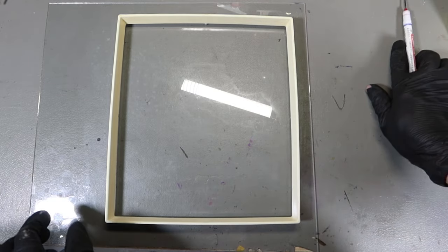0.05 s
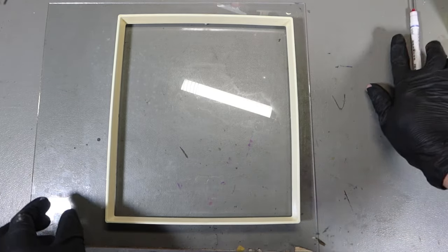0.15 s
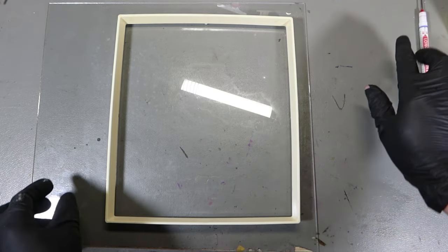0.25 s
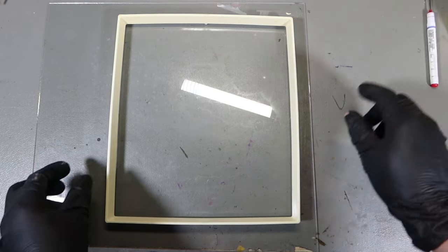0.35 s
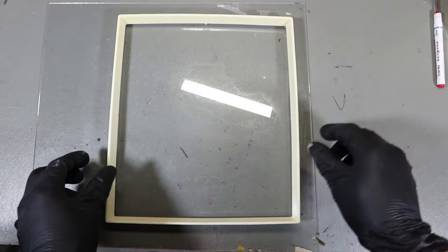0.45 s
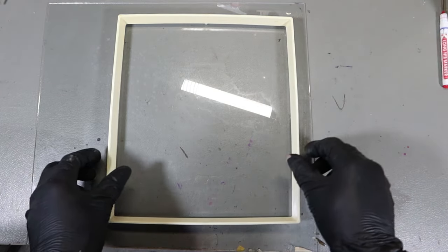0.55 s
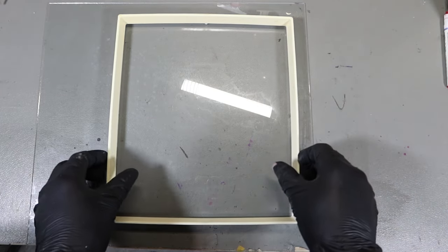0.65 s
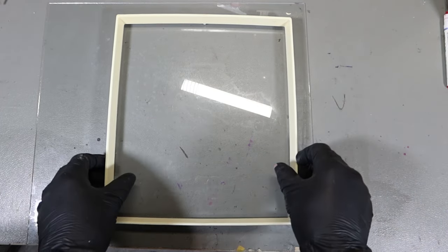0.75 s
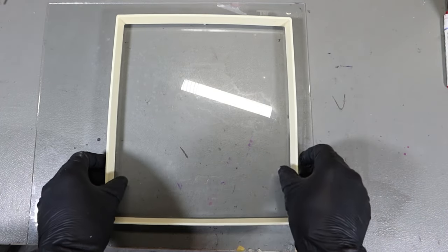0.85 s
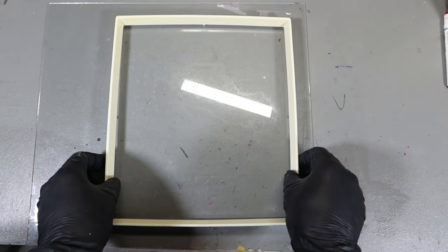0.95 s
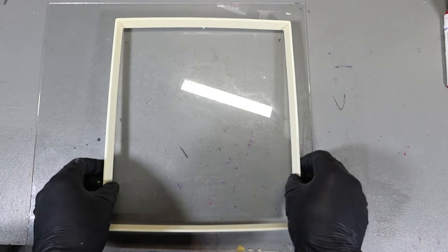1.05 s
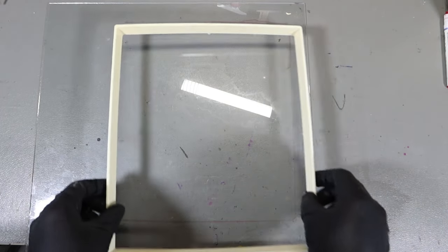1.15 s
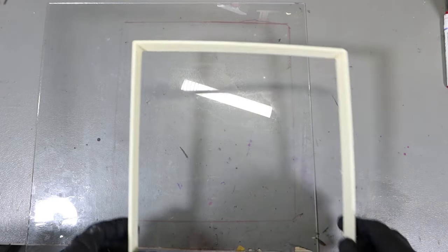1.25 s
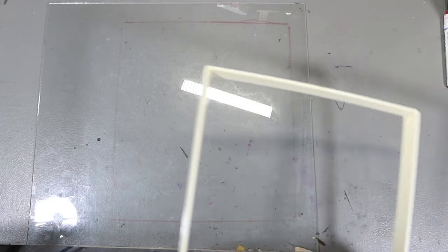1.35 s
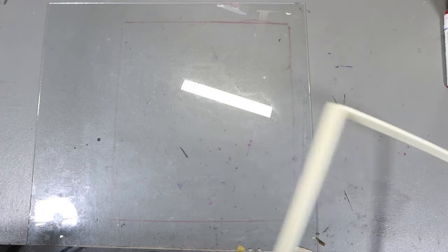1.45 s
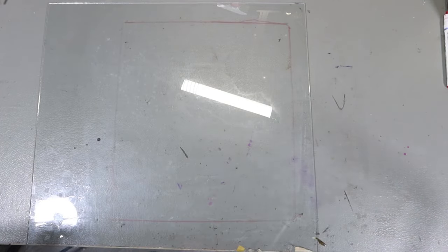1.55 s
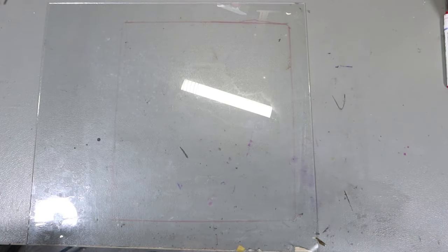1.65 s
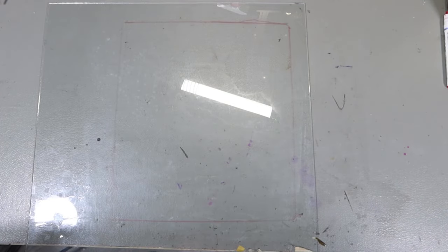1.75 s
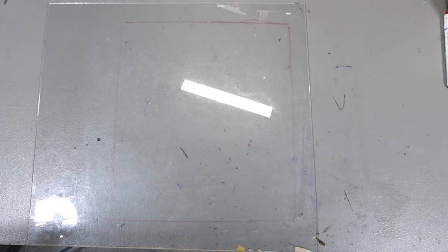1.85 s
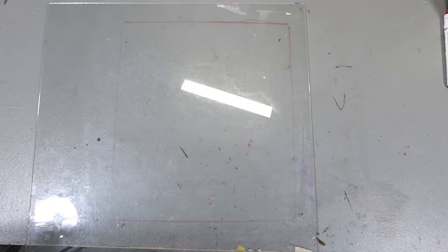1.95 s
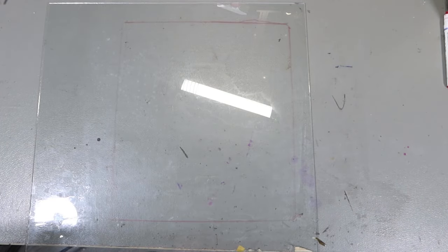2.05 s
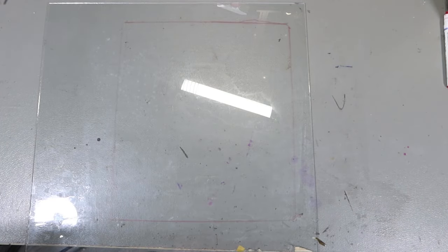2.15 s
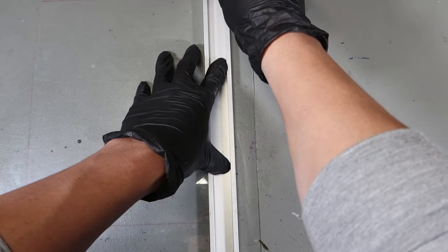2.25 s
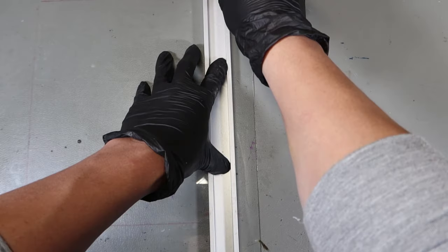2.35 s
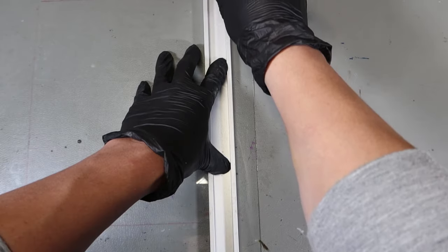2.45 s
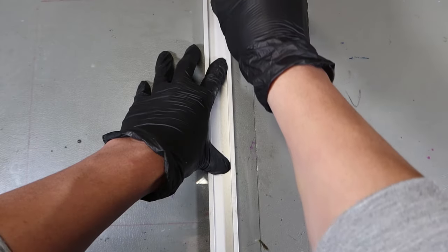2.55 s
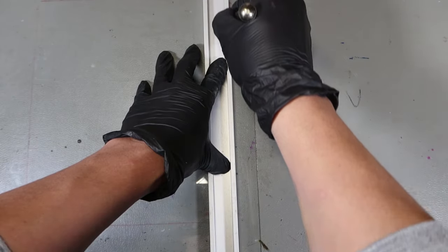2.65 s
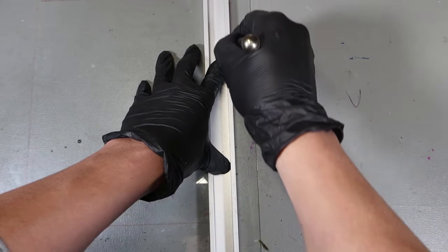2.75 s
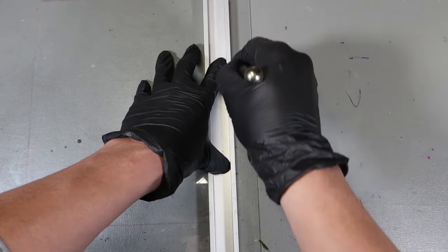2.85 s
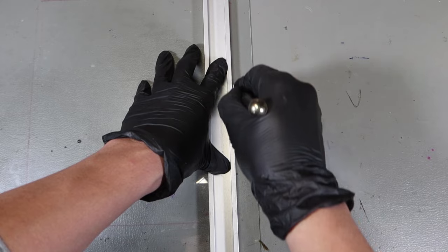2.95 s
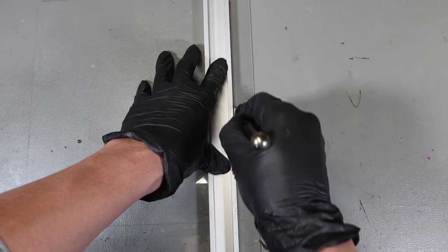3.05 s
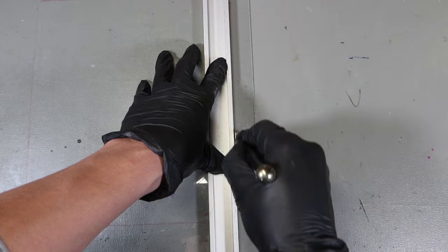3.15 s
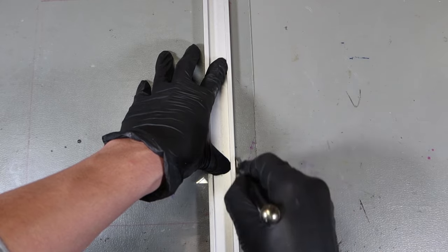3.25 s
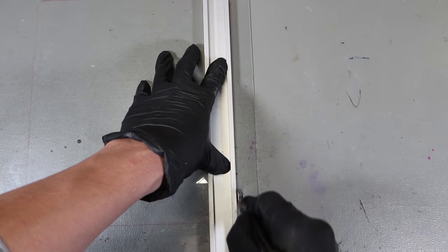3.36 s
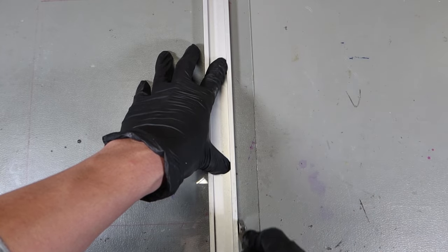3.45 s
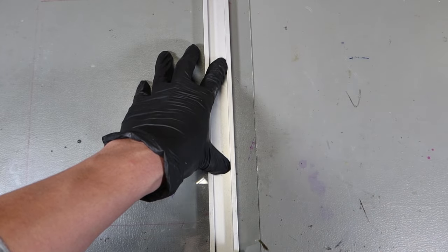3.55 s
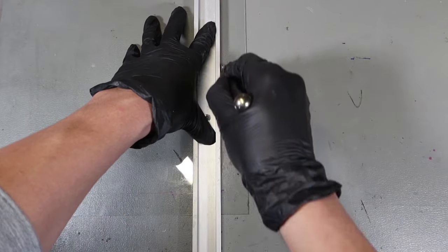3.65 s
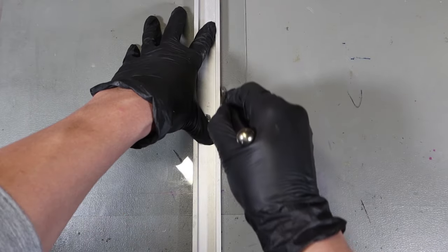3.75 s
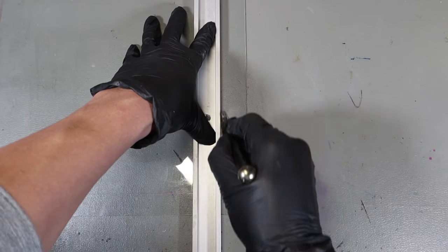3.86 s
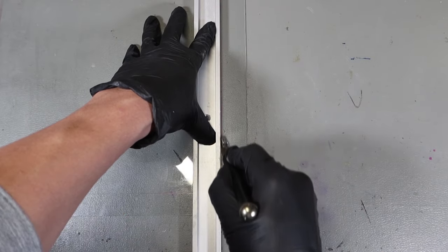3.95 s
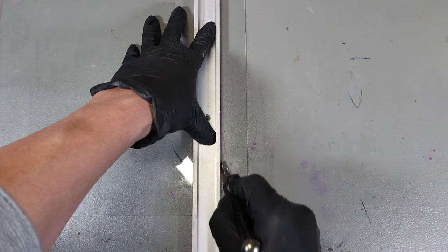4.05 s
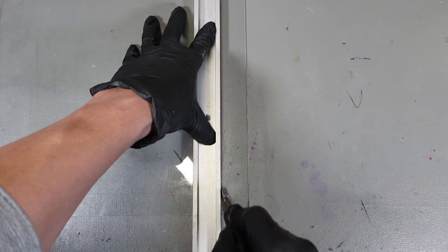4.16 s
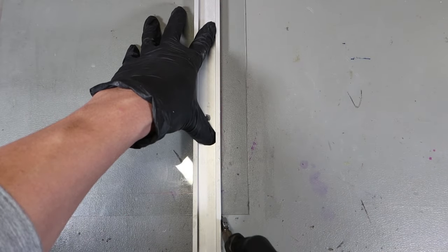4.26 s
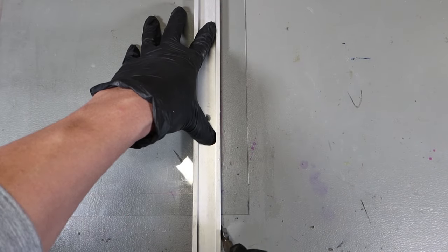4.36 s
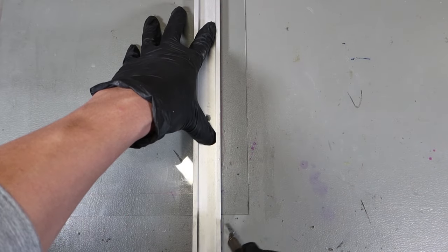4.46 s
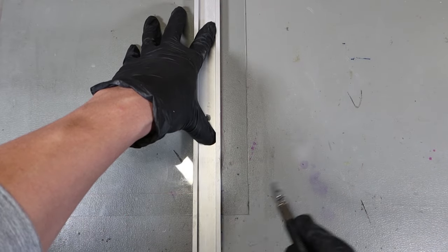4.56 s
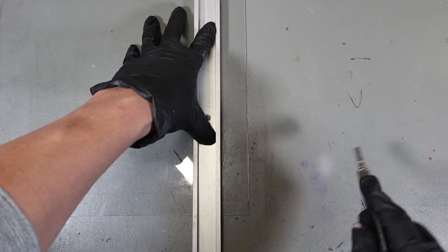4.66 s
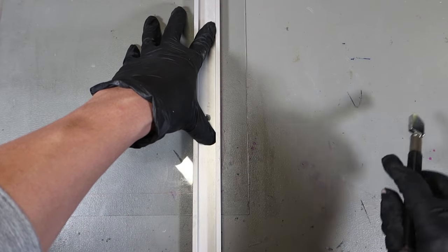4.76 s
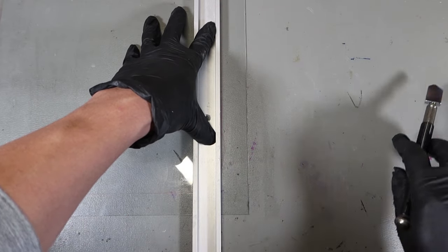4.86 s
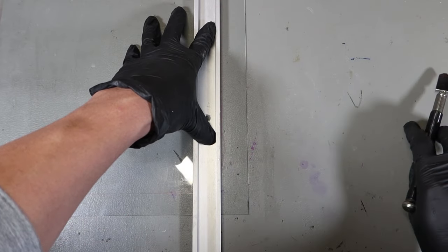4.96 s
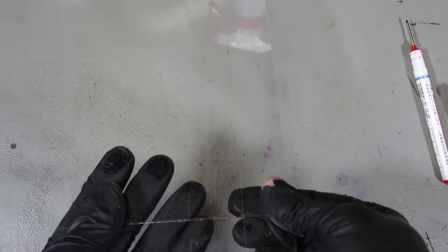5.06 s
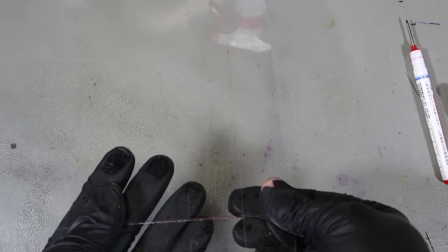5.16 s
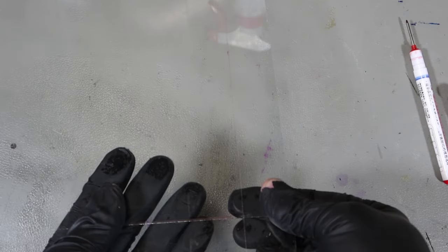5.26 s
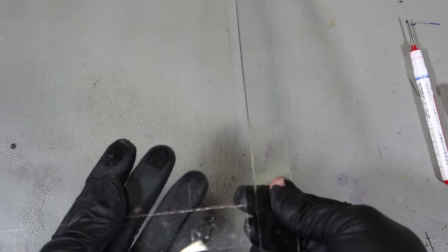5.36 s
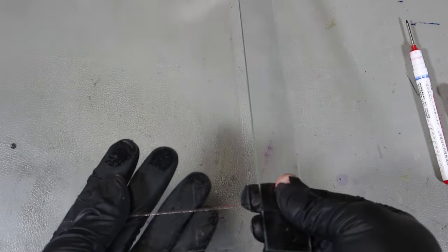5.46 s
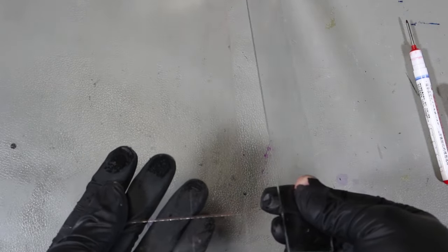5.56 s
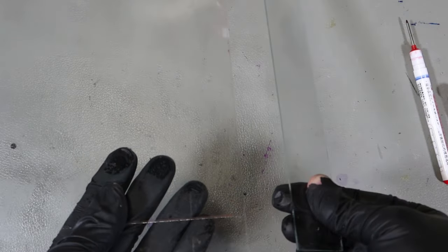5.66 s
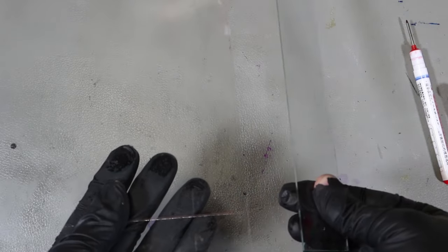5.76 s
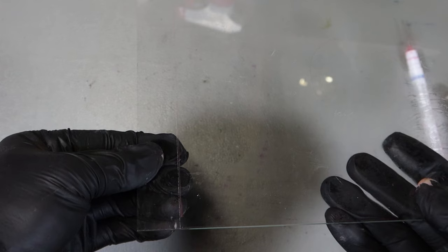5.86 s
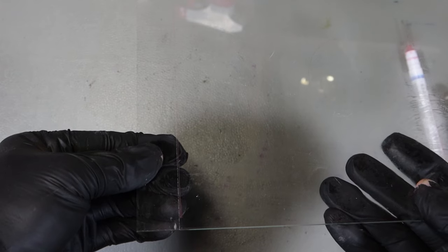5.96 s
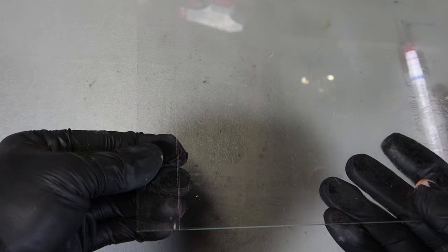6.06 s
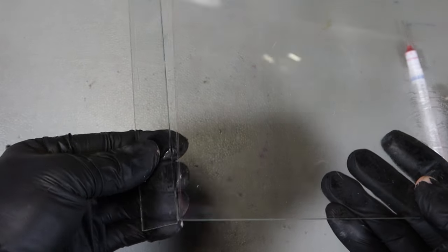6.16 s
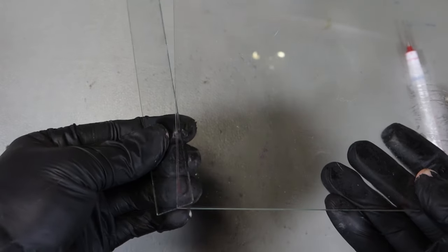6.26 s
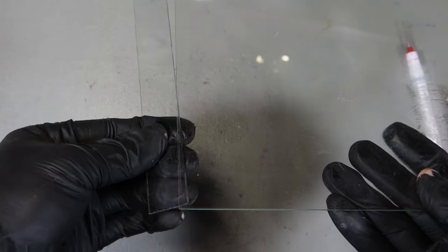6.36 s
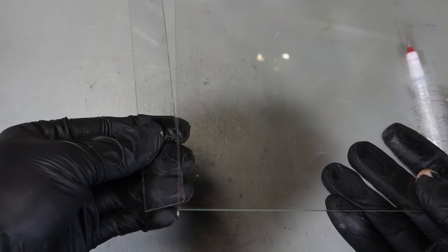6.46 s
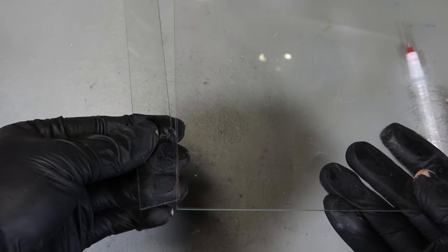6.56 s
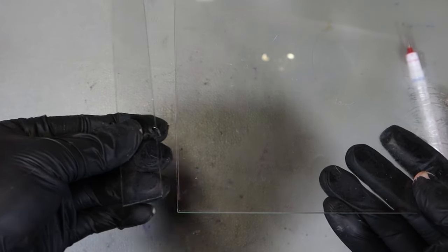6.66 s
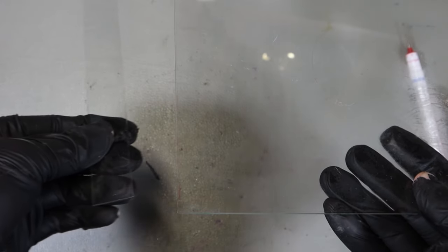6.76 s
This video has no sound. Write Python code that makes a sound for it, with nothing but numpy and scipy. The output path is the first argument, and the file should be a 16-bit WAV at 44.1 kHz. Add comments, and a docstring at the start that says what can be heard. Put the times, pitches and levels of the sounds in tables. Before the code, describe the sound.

The sounds are close, in a small workshop with faint background air. At about 0.2 seconds a marker pen taps down on the bench. Between 0.7 and 1.2 seconds a plastic frame knocks lightly on a glass sheet three times, with a low rumble from the bench. Around 2.1 seconds a rule slides faintly and ticks into place. A cutter wheel catches a few times, then from 2.7 seconds scores the glass with a continuous, gritty, hissing rasp. At 4.4 seconds it runs off the edge and hits the bench with a metallic click and a deep thump. At 5.4 seconds a strip snaps off with a loud, briefly ringing crack, followed by chattering glass edges. A second sharp crack comes at 6.2 seconds, with a light clap and more bright ticks, which fade by 6.8 seconds. The bench booms softly beneath both breaks.

```python
"""Cutting glass on a workbench.

Close up in a small workshop: a pen is put down, a plastic frame knocks on a glass sheet, a rule slides.
A cutter wheel rasps along the rule, crushing tiny chips, and drops off the edge onto the bench.
Two strips snap off and ring, their fresh edges chatter against the sheet; the bench booms under it all."""
import sys
import numpy as np
from scipy import signal
from scipy.fft import rfft, irfft
from scipy.io import wavfile
from scipy.ndimage import uniform_filter1d

SR = 44100
rng = np.random.default_rng(int(sys.argv[2]) if len(sys.argv) > 2 else 0)


def materialize(psi):
    """Save the field psi as 16-bit PCM at rate SR to the path in sys.argv[1].

    A 1-D psi becomes a single channel; in a 2-D psi each row is a channel.
    """
    bounded = np.clip(np.atleast_2d(psi).T, -1, 1)
    quanta = np.round(bounded * 32767).astype(np.int16)
    wavfile.write(sys.argv[1], SR, quanta)


N = 299880
T = np.arange(N) / SR
TAPS = 8192
HZ = np.maximum(np.arange(TAPS + 1) * SR / (2 * TAPS), 1)

# cutter stroke, relative levels: time_s, rasp_db, treble_db, growl_db
STROKE = [(2.66, -50, -7, -2.5), (2.696, -49, -8, -7), (2.772, -45, -5.5, -7), (3.058, -50, -4, -6),
          (3.086, -51.5, -3, -7), (3.288, -47.5, -3, -8.5), (3.368, -50, -2.5, 0), (3.592, -48.5, -1.5, -9),
          (3.662, -50, -4.5, -5.5), (3.846, -49.5, -0.5, -8.5), (4.0, -49, -4.5, -3.5), (4.08, -51, -2, -5),
          (4.264, -47.5, -2.5, -3.5), (4.345, -47, -8, -3)]


def undb(db):
    """Decibels to gain."""
    return 10 ** (np.asarray(db) / 20)


def unit(x):
    """Scale to rms 1."""
    return x / np.sqrt(np.mean(x ** 2))


def curve(table, column=1):
    """One table column, interpolated over time."""
    return np.interp(T, np.array(table)[:, 0], np.array(table)[:, column])


def contour(points, hz=HZ):
    """Values interpolated over log frequency."""
    f, value = np.transpose(points)
    return np.interp(np.log(hz), np.log(f), value)


def humps(modes):
    """Gain of resonances above a flat response."""
    return np.sqrt(1 + sum(undb(db) ** 2 / (1 + (2 * (HZ - f) / width) ** 2) for f, width, db in modes))


def colour(x, gain):
    """Minimum-phase filter; keeps the power of white noise."""
    cepstrum = irfft(np.log(unit(gain) + 1e-9))
    cepstrum[1:TAPS] *= 2
    cepstrum[TAPS + 1:] = 0
    return signal.oaconvolve(x, irfft(np.exp(rfft(cepstrum)))[:TAPS])[:N]


def band(x, low_hz, high_hz):
    """Zero-phase band-pass."""
    return signal.sosfiltfilt(signal.butter(2, [low_hz, high_hz], "band", fs=SR, output="sos"), x)


def walk(rate_hz):
    """Smooth random wander, rms 1."""
    hold = max(int(SR / rate_hz), 1)
    steps = np.repeat(rng.standard_normal(N // hold + 1), hold)
    return unit(uniform_filter1d(steps, hold)[:N])


def contacts(rows, rise_s, linger_db, linger_s, grit_db=2.5):
    """Each contact is a dense burst of uneven slips with a short shiver after it."""
    out, t = np.zeros(N + SR), T[:SR // 5]
    for start_s, db, length_s, bright_hz in rows:
        slips = rng.standard_normal(len(t)) * undb(grit_db * np.minimum(rng.exponential(size=len(t)), 5))
        shiver = undb(linger_db) * np.exp(-t / linger_s)
        shape = (1 - np.exp(-t / rise_s)) * (np.exp(-(t / length_s) ** 2 / 2) + shiver)
        soft = signal.sosfilt(signal.butter(2, min(bright_hz, SR / 2 - 1), fs=SR, output="sos"), slips)
        at = int(start_s * SR)
        out[at:at + len(t)] += undb(db) * unit(shape * soft) * np.sqrt(np.mean(shape ** 2))
    return out[:N]


def background(air_db=-64, sway_db=1.15, ramp_s=0.0085):
    """Quiet workshop air with a faint early hum and one brief far tone."""
    # air spectrum: freq_hz, gain_db
    spectrum = [(15, -47), (25, -9.5), (70, -9), (102, 3), (137, -16.5), (174, -13.5), (316, -17.5),
                (449, -13), (542, -19), (857, -17.5), (1250, -23), (2520, -26), (15800, -32.5)]
    # faint tones: start_s, end_s, pitch_hz, level_db
    tones = [(0, 2.2, 177.5, -72.5), (5.0, 5.11, 547, -64.5)]
    air = unit(colour(rng.standard_normal(N), undb(contour(spectrum))))
    air *= undb(air_db + sway_db * walk(4.6))
    for start_s, end_s, hz, db in tones:
        gate = np.clip(np.minimum(T - start_s, end_s - T) / ramp_s, 0, 1)
        air += undb(db) * gate * np.sin(2 * np.pi * hz * T)
    return air


def room(x, room_db=-11.5, build_s=0.0031):
    """Diffuse wall reflections build up quickly and lose their treble first."""
    # reverberation: freq_hz, t60_s
    decays = [(150, .5), (600, 0.3), (2500, 0.29), (7000, 0.26), (15000, 0.15)]
    t = T[:SR * 3 // 4]
    noise, response = rfft(rng.standard_normal(len(t))), 0
    hz = np.maximum(np.arange(len(noise)) * SR / len(t), 1)
    centres_hz, t60s_s = np.transpose(decays)
    for weights, t60_s in zip(np.eye(len(decays)), t60s_s):
        share = np.interp(np.log(hz), np.log(centres_hz), weights)
        response += irfft(noise * share, len(t)) * undb(-60 * t / t60_s)
    response *= 1 - np.exp(-t / build_s)
    return undb(room_db) * signal.fftconvolve(x, response / np.linalg.norm(response))[:N]


def rocking(resting_db=-69, wheel_db=-2.5, uneven_db=3.0, rise_s=0.025, fade_db_per_s=184.5):
    """How hard the bench rocks under resting hands, the wheel's drag and single pushes."""
    # hands and glass lean on the bench: start_s, level_db, held_s
    pushes = [(0, -57, .11), (.78, -41, .11), (1.015, -40.5, 0.025), (1.109, -41.5, .1),
              (2.68, -46.5, 0.13), (3.255, -49, 0.035), (3.63, -41.5, 0.1), (3.98, -48.5, .22),
              (4.365, -29.5, 0.093), (4.55, -38, 0.026), (4.68, -50, .23), (5.42, -38.5, 0.24),
              (5.789, -50, .04), (5.96, -52.5, .05), (6.24, -36, 0.095), (6.43, -40.5, 0.092)]
    power = undb(resting_db) ** 2 + (undb(wheel_db) * wheel_pressure()) ** 2
    power *= undb(uneven_db * walk(30)) ** 2
    for start_s, db, held_s in pushes:
        swell = np.clip((T - start_s) / rise_s, 0, 1)
        fade_db = fade_db_per_s * np.clip(T - start_s - held_s, 0, 1)
        power += (swell * undb(db - fade_db)) ** 2
    return np.sqrt(power)


def bench_boom(boom_hz=92, wander_hz=3.5, boom_db=-3.5, rumble_db=-10.5):
    """The rocked bench rumbles and hums in its lowest mode, whose pitch wanders."""
    # rumble spectrum: freq_hz, gain_db
    spectrum = [(20, -32), (55, -1.0), (105, 6.5), (150, -9.5), (230, -23.5), (700, -58), (3000, -94.0)]
    pitch_hz = boom_hz + wander_hz * walk(12)
    mode = np.sqrt(2) * np.sin(2 * np.pi * np.cumsum(pitch_hz) / SR)
    rumble = colour(rng.standard_normal(N), undb(contour(spectrum)))
    return rocking() * (undb(boom_db) * mode + undb(rumble_db) * rumble)


def bench_thumps(rise_s=0.002):
    """The cutter hand, then the springing sheet, strike the bench top's modes."""
    # soft, heavy blows: start_s, gain_db
    blows = [(4.3692, 4), (5.41, -13), (5.459, -17.5), (5.599, -22)]
    # bench top: freq_hz, level_db, t60_s
    modes = [(95, -28.5, 0.28), (127, -20.5, 0.067), (157, -12.5, 0.017), (306, -12.5, 0.065),
             (329, -22.5, 0.016), (441, -36, 0.13), (526, -37, 0.13), (654, -26.5, 0.045)]
    out, t = np.zeros(N + SR), T[:SR // 2]
    thump = sum(undb(db - 60 * t / t60_s) * np.sin(2 * np.pi * hz * t) for hz, db, t60_s in modes)
    thump *= 1 - np.exp(-t / rise_s)
    for start_s, db in blows:
        at = int(start_s * SR)
        out[at:at + len(t)] += undb(db) * thump
    return out[:N]


def rule_slide(flutter_db=2.5):
    """The rule rustles into place on the glass."""
    # friction: time_s, level_db
    slide = [(1.9, -100), (2.05, -81), (2.16, -69.5), (2.26, -76), (2.34, -100)]
    return unit(band(rng.standard_normal(N), 2000, 10000)) * undb(curve(slide) + flutter_db * walk(25))


def pen():
    """A marker pen taps the bench as it is laid down."""
    # taps: start_s, level_db, length_s, bright_hz
    taps = [(.1365, -53.5, 0.0016, 5100), (.186, -48, 0.0024, 1400), (.1938, -35.5, 0.0019, 7940)]
    # pen body: freq_hz, gain_db
    body = [(150, -21), (300, -11), (520, 2), (750, -4), (1100, -0.5), (1900, -6), (2800, 1), (4200, -1.5),
            (8000, -14), (15000, -26)]
    return colour(contacts(taps, rise_s=0.00044, linger_db=-11.5, linger_s=0.012), undb(contour(body)))


def rebounds(start_s, db, touches, gap_s, length_s, bright_hz, gap_ratio=0.7, step_db=-5.5, dulling=0.83):
    """Contacts of a bouncing thing, each sooner, weaker and duller than the last."""
    return [(start_s + gap_s * np.sum(gap_ratio ** np.arange(k)), db + k * step_db,
             length_s, bright_hz * dulling ** k) for k in range(round(touches))]


def knocks(spot_width_hz=320, spot_db=6.5):
    """Frame, rule and cutter handle knock on the damped sheet; each spot has its own resonance."""
    # knocks: start_s, level_db, touches, first_gap_s, length_s, bright_hz, spot_hz
    hits = [(0.733, -59.5, 1, 0, 0.015, 1980, 483), (.769, -36.5, 4, .0172, 0.0049, 3900, 1870),
            (1.005, -44, 2, .008, 0.004, 4300, 1720), (1.106, -43.5, 2, .0205, 0.0047, 3150, 1000),
            (2.151, -57, 1, 0, 0.0024, 9000, 4750), (4.437, -50.5, 1, 0, 0.0046, 8050, 2110),
            (4.51, -55.5, 1, 0, .005, 5160, 3020), (4.531, -53.5, 1, 0, 0.013, 3300, 1880)]
    # plastic spectrum: freq_hz, gain_db
    spectrum = [(150, -3), (300, -4), (650, -7.5), (1400, -7), (3300, -0.5), (5500, -2), (9000, -1),
                (15000, -11)]
    # plastic resonances: freq_hz, width_hz, gain_db
    modes = [(970, 210, 9.5), (1770, 380, 9), (2510, 300, 6.5), (2970, 400, 4)]
    body = undb(contour(spectrum)) * humps(modes)
    out = np.zeros(N)
    for *hit, spot_hz in hits:
        force = contacts(rebounds(*hit), rise_s=0.000086, linger_db=-44, linger_s=0.011)
        out += colour(force, body * humps([(spot_hz, spot_width_hz, spot_db)]))
    return out


def cutter_drop():
    """The wheel runs off the sheet; its steel head hits the bench and rings briefly."""
    # impact: start_s, level_db, length_s, bright_hz
    impact = [(4.3652, -25, 0.0044, 11500)]
    # steel head: freq_hz, width_hz, gain_db
    modes = [(2680, 300, 6), (5530, 50, -9), (6740, 75, 5), (9670, 180, 8), (14100, 80, 6.5)]
    return colour(contacts(impact, rise_s=0.00012, linger_db=-15.5, linger_s=0.011), humps(modes))


def edge_chatter(bright_hz=12800):
    """Fresh edges tick against each other in short, evenly paced runs."""
    # runs: start_s, level_db, ticks, gap_s, step_db, length_s
    runs = [(5.444, -39, 4, .022, -4.5, .009), (5.601, -45, 2, 0.013, -6, 0.0065),
            (5.618, -41, 5, .0125, -0.5, .009), (5.942, -46, 3, .009, -0.5, .007),
            (6.0362, -40.5, 2, .0243, -5.5, .008), (6.269, -31, 1, 0, 0, .0067),
            (6.335, -31, 2, .021, -6.5, .0025), (6.389, -31, 2, .0195, 0, 0.0083),
            (6.488, -52.5, 1, 0, 0, .008), (6.611, -62, 1, 0, 1.5, 0.0064), (6.7707, -63, 1, 0, 0, 0.0065)]
    # edge spectrum: freq_hz, gain_db
    spectrum = [(300, -13), (1000, -15), (2500, -7), (4000, -5.5), (6000, -5), (7300, -6), (10500, -1),
                (15500, -8.5)]
    # edge resonances: freq_hz, width_hz, gain_db
    modes = [(4870, 161, -0.5), (7170, 540, 12), (9700, 400, 2.5), (12300, 620, 3)]
    ticks = [(start_s + k * gap_s, db + k * step_db, length_s, bright_hz)
             for start_s, db, count, gap_s, step_db, length_s in runs for k in range(round(count))]
    force = contacts(ticks, rise_s=0.00063, linger_db=-33.5, linger_s=0.008)
    return colour(force, undb(contour(spectrum)) * humps(modes))


def wheel_pressure(touch_s=2.44, bite_s=2.65, run_off_s=4.36, press_db_per_s=57):
    """Gain of the wheel on the glass: grows until it bites, follows the stroke, ends at the edge."""
    touching = np.clip((T - touch_s) / 0.028, 0, 1) * np.clip(1 - (T - run_off_s) / 0.015, 0, 1)
    return touching * undb(curve(STROKE) - press_db_per_s * np.maximum(bite_s - T, 0))


def swirl(x, depth_db=2.8, frames=20, bins=3):
    """Narrow bands swell and fade at random as the wheel crosses the sheet's nodes and antinodes."""
    spectra = signal.stft(x, nperseg=512)[2]
    field = uniform_filter1d(rng.standard_normal(spectra.shape), frames, axis=1)
    field = uniform_filter1d(field, bins, axis=0)
    return signal.istft(spectra * undb(depth_db * unit(field)))[1][:N]


def wheel_sing(width_hz=650, gain_db=-2.0):
    """The brightest resonance under the wheel: a gliding band of noise."""
    # glide: time_s, centre_hz, relative_db
    glide = [(2.7, 8050, -26), (2.8, 8200, -7.5), (3.3, 8300, -18), (3.5, 7100, -5), (3.6, 7180, -4),
             (3.68, 7600, -29), (3.88, 8850, -3), (4.0, 8900, -20)]
    phase = 2 * np.pi * np.cumsum(curve(glide)) / SR
    noise = walk(width_hz) * np.cos(phase) + walk(width_hz) * np.sin(phase)
    return noise * undb(curve(glide, column=2) + gain_db)


def scoring(chip_db=2.5, flutter_db=1.0, gain_db=-0.5, catch_hz=10700):
    """The wheel catches, then crushes a line of tiny chips that ring the sheet."""
    # rasp spectrum: freq_hz, gain_db
    spectrum = [(120, -14.5), (200, -28), (288, -3.5), (423, -13), (621, 1), (760, -3), (1160, -6.5),
                (1930, -2.5), (2280, -5), (2830, -3), (3800, -1.5), (4560, -5.5), (8180, -1), (12000, -5.5),
                (15800, -20.5)]
    # sheet resonances under the wheel: freq_hz, width_hz, gain_db
    modes = [(644, 51, 6.5), (1890, 210, 3.5), (2860, 370, 4.5), (3720, 210, 2)]
    # modes that answer as the wheel passes their antinode: time_s, passing_s, low_hz, high_hz, gain_db
    antinodes = [(2.68, .35, 291, 310, 9), (3.26, 0.16, 1290, 1570, 3), (3.31, 0.077, 1850, 2050, -3),
                 (4.12, .16, 2780, 3020, -4)]
    # catches as the wheel bites in: start_s, level_db, length_s
    catches = [(2.3836, -60.5, 0.0044), (2.471, -56, 0.014), (2.5258, -55, 0.015), (2.577, -53, .018)]
    sizes = np.minimum(rng.exponential(size=N), 4)
    chips = rng.standard_normal(N) * undb(chip_db * sizes)
    rasp = unit(swirl(colour(chips, undb(contour(spectrum)) * humps(modes))))
    swells = sum(undb(db) * np.exp(-((T - time_s) / passing_s) ** 2 / 2) * band(rasp, low_hz, high_hz)
                 for time_s, passing_s, low_hz, high_hz, db in antinodes)
    treble = (undb(curve(STROKE, column=2) + 3.5) - 1) * band(rasp, 5600, 16370)
    growl = (undb(curve(STROKE, column=3) + 5.0) - 1) * band(rasp, 1970, 3500)
    cut = (rasp + treble + growl + swells + wheel_sing()) * wheel_pressure()
    snags = contacts([(*row, catch_hz) for row in catches], rise_s=0.00034, linger_db=-30, linger_s=0.01)
    return cut * undb(gain_db + flutter_db * walk(70)) + colour(snags, undb(contour(spectrum)))


def glass_ring(blows, modes, rise_s=0.001, damping=0.67):
    """Each blow rings the glass modes, weakly above its brightness; wider modes die sooner."""
    # radiation of the modes: freq_hz, gain_db
    radiation = [(450, 0), (700, 2), (1500, -2.5), (3000, 0.5), (6500, 0), (12000, 2.5)]
    out = np.zeros(N + SR)
    for start_s, blow_db, _, bright_hz in blows:
        at = int(start_s * SR)
        for hz, width_hz, db in modes:
            t = T[:int(SR * min(2 / width_hz, 0.5))]
            size = undb(blow_db + db + contour(radiation, hz)) * np.sqrt(width_hz / 50)
            size /= np.hypot(1, (hz / bright_hz) ** 2)
            fade = (1 - np.exp(-t / rise_s)) * np.exp(-np.pi * width_hz * damping * t)
            out[at:at + len(t)] += size * fade * np.sin(2 * np.pi * hz * t + rng.uniform(0, 2 * np.pi))
    return out[:N]


def breaking(crack_db=-1.0, first_db=-8.5, second_db=-11.5, snap_bend_db=-30, clap_bend_db=-36.5):
    """Cracks and claps radiate at once and ring the glass; it has other modes once it is shorter."""
    # a crack runs down each score: start_s, level_db, length_s, bright_hz
    snaps = [(5.4072, -10.5, 0.0071, 11020), (6.2312, -9, 0.0058, 15200)]
    # the freed strip claps against the sheet: start_s, level_db, length_s, bright_hz
    claps = [(5.595, -27, 0.0087, 1960), (6.333, -19.5, 0.0091, 10060)]
    # fracture spectrum: freq_hz, gain_db
    spectrum = [(50, -39.5), (150, -21), (250, -13.5), (450, -2.5), (1500, -4), (3000, -1.5), (4800, -4),
                (6300, 3.5), (9000, -1), (12000, -4), (15500, -10)]
    # glass at the first break: freq_hz, width_hz, gain_db
    first_modes = [(441, 32, -4), (646, 65, 0), (980, 95, -5), (1500, 38, -5), (1730, 27, -6),
                   (1990, 55, -9), (2220, 37, -4), (3000, 90, -3), (3490, 35, -9), (3880, 29, -9),
                   (4830, 46, -8), (5080, 78, -11), (6030, 41, 0), (6340, 110, -1), (6860, 92, -3),
                   (7450, 34, -6), (7840, 45, -8), (8420, 34, -10), (8750, 73, -10), (9420, 61, -8),
                   (9570, 29, -10), (10700, 45, -16), (11200, 46, -15), (12400, 37, -17)]
    # glass at the second break: freq_hz, width_hz, gain_db
    second_modes = [(533, 25, -1), (888, 35, 0), (1100, 19, -7), (1330, 70, -13), (1820, 41, -6),
                    (2180, 18, -12), (2470, 31, -2), (3350, 34, -1), (3890, 170, -4), (4360, 29, -3),
                    (4980, 31, -4), (5240, 45, -2), (5850, 160, -5), (6930, 53, -6), (7480, 44, -3),
                    (7880, 69, -3), (8240, 20, -7), (9130, 54, 0), (10500, 130, -3), (11000, 120, -12),
                    (11200, 92, -14), (11600, 55, -11), (12000, 160, -12), (12200, 52, -8), (12700, 55, -9)]
    # bending modes of the first strip, held free: freq_hz, width_hz, gain_db
    strip_modes = [(702, 6.1, -4), (2995, 11, 0.5), (4694, 10, -3.5)]
    force = contacts(snaps, rise_s=0.00082, linger_db=-14.5, linger_s=0.016)
    force += contacts(claps, rise_s=0.0034, linger_db=-6.5, linger_s=0.022)
    first = undb(first_db) * glass_ring([snaps[0], claps[0]], first_modes)
    bends = [(snaps[0][0], snap_bend_db, 0, SR / 2), (claps[0][0], clap_bend_db, 0, SR / 2)]
    strip = glass_ring(bends, strip_modes, rise_s=0.0012)
    second = undb(second_db) * glass_ring([snaps[1], claps[1]], second_modes)
    return undb(crack_db) * colour(force, undb(contour(spectrum))) + first + strip + second


def scene():
    """The work on the bench, its room and the air, in mono; the thumps stay close."""
    thumps = bench_thumps()
    work = scoring() + breaking() + edge_chatter() + pen() + knocks() + rule_slide() + cutter_drop()
    return (work + thumps + room(work + 0.19 * thumps) + bench_boom() + background())[None]


def record(dry, low_hz=35, top_hz=15900):
    """The microphone sheds the deepest bass, clips at full scale and cuts the top."""
    thin = signal.sosfilt(signal.butter(2, low_hz, "high", fs=SR, output="sos"), dry)
    return signal.sosfilt(signal.ellip(8, 0.2, 70, top_hz, fs=SR, output="sos"), np.clip(thin, -1, 1))


dry = scene()
out = record(dry)
materialize(out)
```